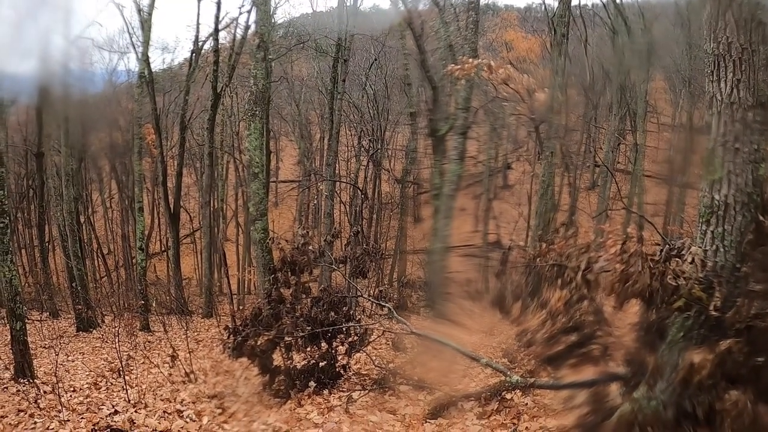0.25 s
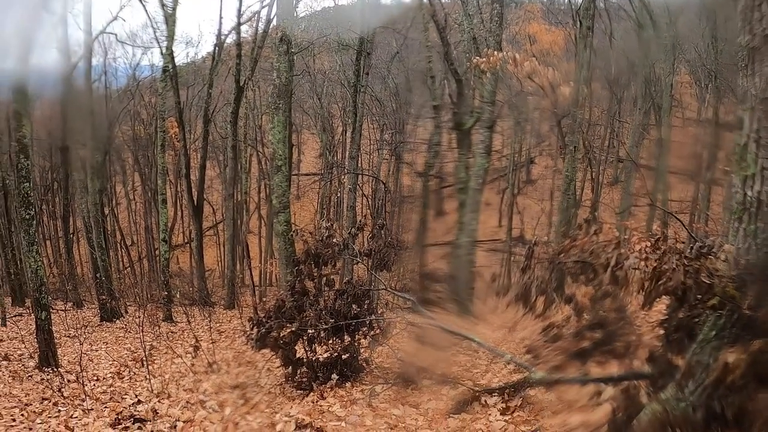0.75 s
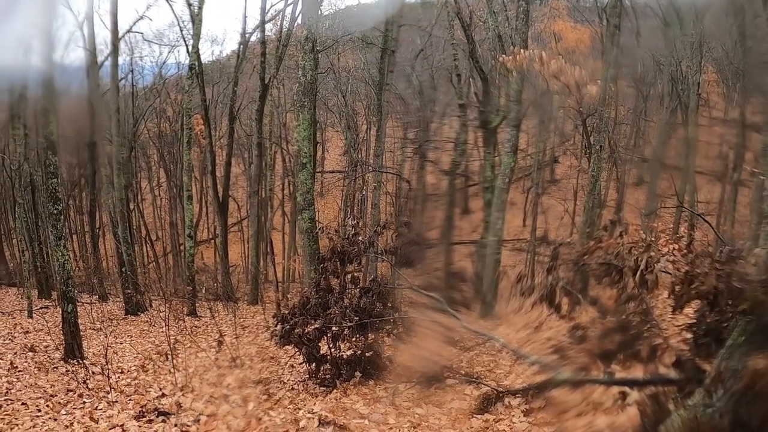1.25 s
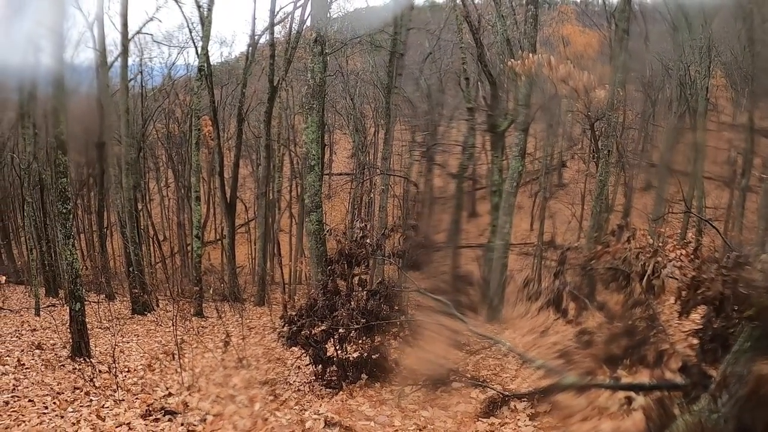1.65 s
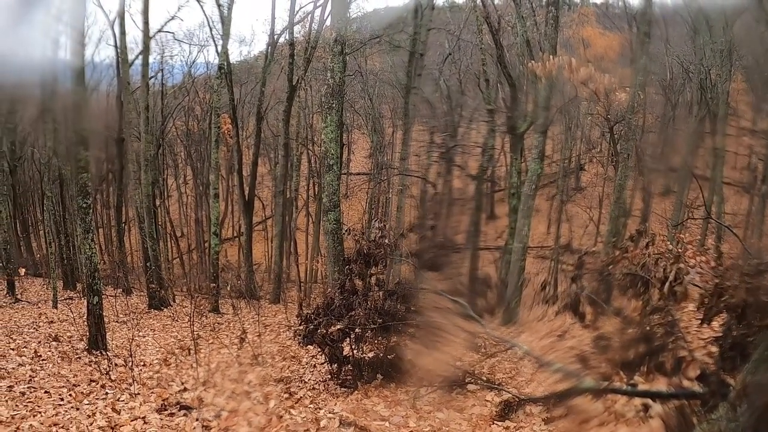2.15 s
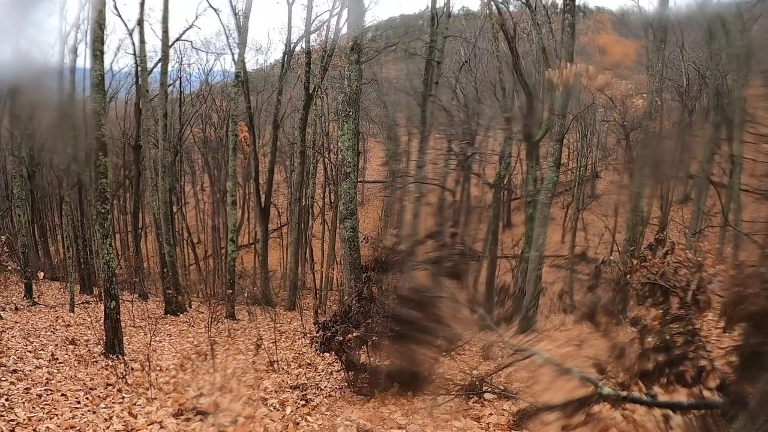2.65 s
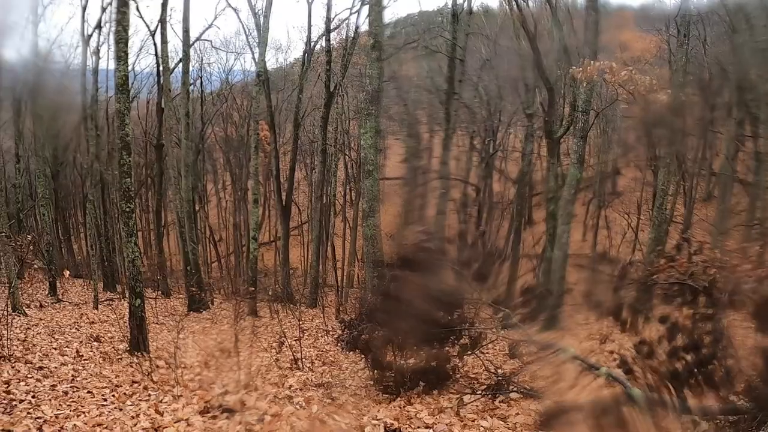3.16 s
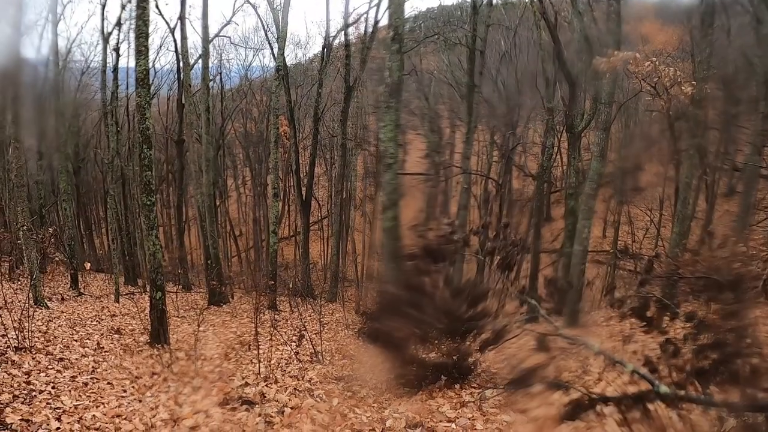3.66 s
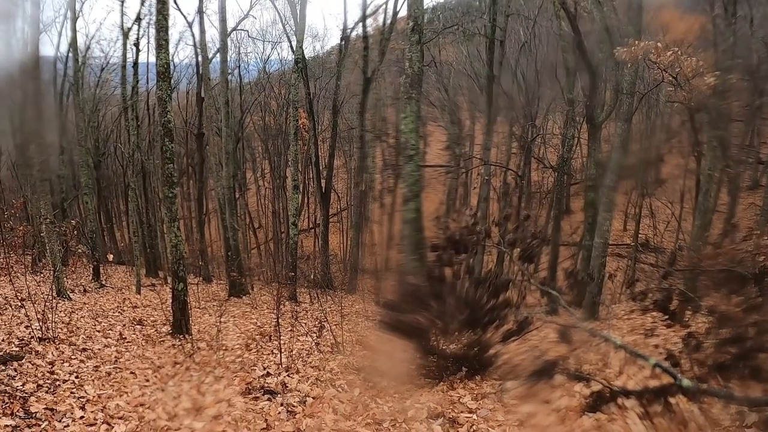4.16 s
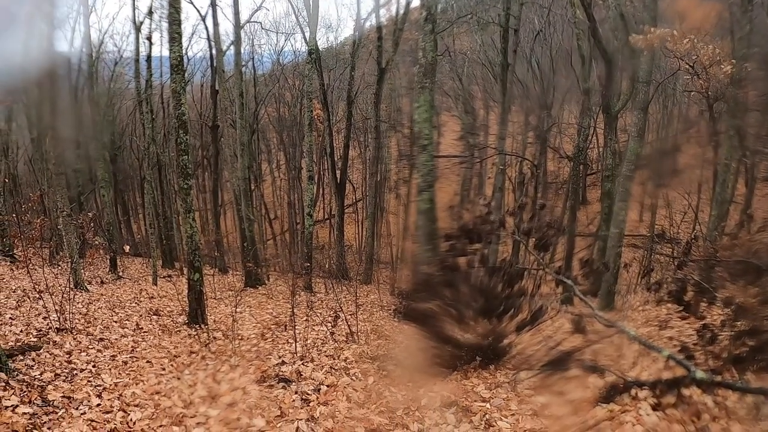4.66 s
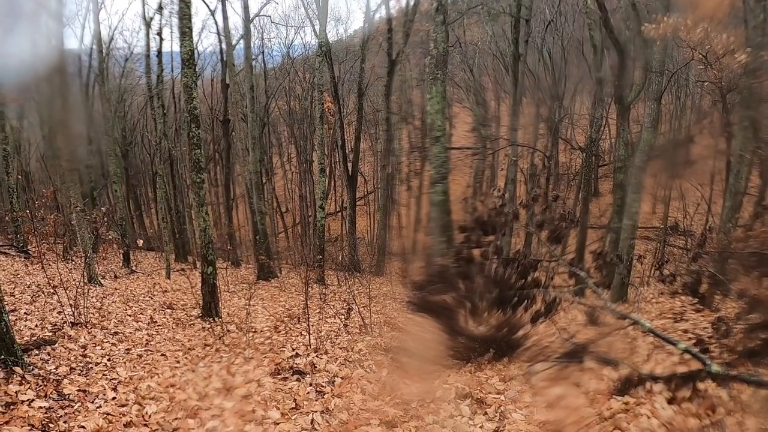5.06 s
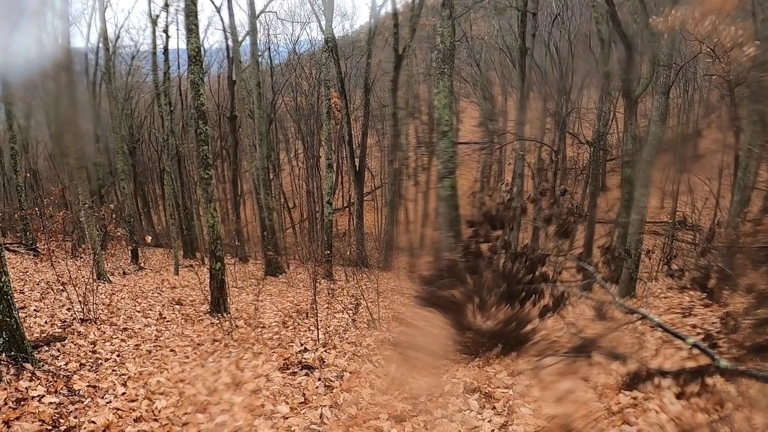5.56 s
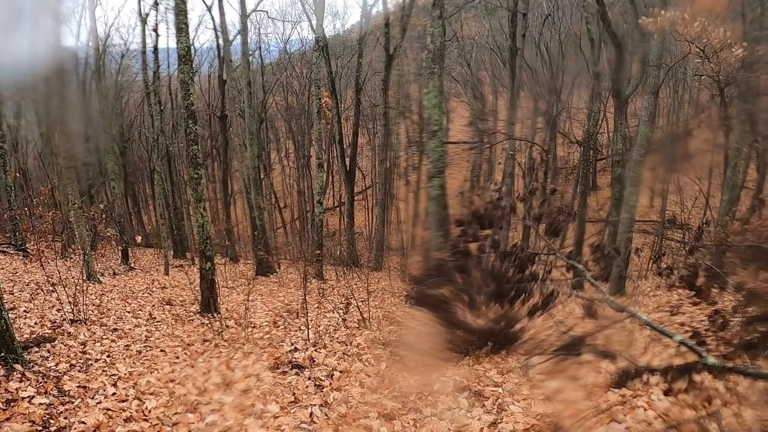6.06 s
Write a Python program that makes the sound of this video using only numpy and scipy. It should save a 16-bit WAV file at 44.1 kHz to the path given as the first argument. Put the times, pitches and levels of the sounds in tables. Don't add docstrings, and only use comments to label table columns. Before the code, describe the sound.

Distant hounds bay in three drawn-out calls across leafy woodland, echoing long, while drips tick and dry leaves rustle close by.

```python
import sys
import numpy as np
from scipy import signal
from scipy.fft import rfft, irfft, next_fast_len
from scipy.io import wavfile
from scipy.ndimage import uniform_filter1d

SR = 44100
rng = np.random.default_rng(int(sys.argv[2]) if len(sys.argv) > 2 else 0)


def volts(x):
    e = np.asarray(x, float) / 20
    return 10 ** e


def master(y):
    cut = np.clip(np.atleast_2d(y).T, -1, 1)
    pcm = np.round(cut * 32767)
    wavfile.write(sys.argv[1], SR, pcm.astype(np.int16))


N = 278271

# frequency in Hz, level in dB per Hz.
AIR_SPECTRUM = [(70, -15.5), (120, -7), (190, 1.5), (260, -1), (400, -8.5), (550, -8), (800, -21),
                (1050, -9), (1600, -14), (2500, -17), (4000, -18.5), (7800, -27.5), (9500, -42.5),
                (14000, -56.5)]
# frequency in Hz, left-right likeness of the air (0-1).
AIR_LIKENESS = [(30, .2), (120, 0.47), (300, 0.89), (1000, 0.76), (3000, 0.67), (8000, 0.11)]
# time in seconds, level in dB.
VALLEY_ROAR = [(0, -0.3), (2, -0.1), (3.2, 1), (3.8, 1.5), (4.2, -1.5), (5.2, -1), (5.7, -0.5),
               (6.31, -6.5)]
AIR_DB, AIR_SWELL_DB, ROAR_TOP_HZ = -55.5, 1.1, 360

# frequency in Hz, level in dB per Hz.
GUST_SPECTRUM = [(8.8, -24), (15, 1.5), (43, 2.5), (57, 1), (103, -17), (130, -22.5), (170, -55),
                 (290, -120)]
# time in seconds, level in dB.
BREEZE = [(0, -62.5), (1.7, -64), (1.85, -49), (2.5, -64), (2.65, -64), (2.85, -54), (3.44, -56),
          (3.55, -66), (6.31, -65)]
# peak time in seconds, peak level in dB.
PUFFS = [
    (1.8, -44),
    (2.049, -34.5),
    (2.36, -39.5),
    (2.8, -40.5),
]
PUFF_RISE_DB_PER_S, PUFF_FALL_DB_PER_S = 353, 218

# frequency in Hz, level in dB per Hz.
RUSTLE_SPECTRUM = [(600, -13.5), (1500, 1.5), (2500, -2), (4000, -6.5), (7800, -16.5), (9500, -31),
                   (14000, -46.5)]
# time in seconds, level in dB.
LITTER_CALM = [(0, -58.5), (2.6, -62), (3.2, -57.5), (5.1, -61), (6.31, -64)]
# peak time in seconds, peak level in dB.
STIRS = [(.14, -59.5), (1.0, -62), (1.17, -53.5), (1.29, -54), (1.72, -61), (2.1, -63), (2.86, -60.5),
         (3.62, -57.5), (3.78, -55), (4.3, -59.5), (4.821, -53.5), (5.32, -62.5), (6.16, -58.5)]
STIR_S = 0.11

# start in seconds, peak in dB, pitch in Hz, left-right in dB.
LOUD_TICKS = [(.2398, -42.5, 6460, -3), (.5866, -44, 3600, 9), (.884, -40.5, 4636, 0),
              (1.078, -43, 5500, -1), (1.1175, -41, 4500, -2), (1.155, -46.5, 5410, 1),
              (1.7786, -40.5, 3830, 5), (1.93, -43.5, 5446, -1), (1.805, -43.5, 5170, 2),
              (1.964, -34, 3500, 4), (2.3492, -41, 5700, -1), (2.615, -39.5, 3570, 4),
              (2.6237, -44, 6500, 2), (2.6612, -44, 3920, 7), (3.523, -42.5, 5440, -3),
              (3.6094, -46, 6000, -7), (4.0461, -33.5, 4320, 4), (4.0603, -45, 3950, 5.5),
              (4.181, -43.5, 5250, 3), (4.2075, -41, 4160, -1), (4.411, -41, 4215, 5),
              (4.4885, -38.5, 3780, 3.5), (4.7244, -38, 4860, 4), (4.7684, -43, 3900, 3),
              (4.8765, -44, 5864, 1), (5.3394, -42, 3400, 1), (5.3893, -39, 4750, 0.5),
              (5.9792, -42.5, 5020, 1), (6.24, -44, 4700, -1)]
# start in seconds, peak in dB, pitch in Hz, left-right in dB.
TWIG_SNAPS = [(.0747, -61, 9500, -1), (.708, -61.5, 9400, -2), (0.867, -55, 11300, -1.5),
              (.884, -55, 10500, 0.5), (.936, -52.5, 8960, -5), (1.078, -47, 11500, -1.5),
              (1.469, -58, 10000, -5), (1.7582, -56, 10770, 5), (2.052, -64, 10000, 3),
              (2.21, -63, 12100, 2), (2.455, -59, 8900, 1), (3.485, -59.5, 11000, 0),
              (3.522, -55.5, 10500, -3), (3.5503, -57.5, 10000, -4), (3.586, -58, 9900, 1),
              (3.609, -50.5, 11260, 0), (3.783, -59.5, 10100, -2), (3.941, -65, 9500, 0),
              (4.0454, -60.5, 11400, -1), (4.1525, -58.5, 8000, -0.5), (4.1813, -57.5, 11000, 1.5),
              (4.539, -57, 12800, 2), (4.7237, -59.5, 11000, 3), (4.795, -59, 9000, -0.5),
              (4.827, -52.5, 9000, 6), (4.994, -59, 10000, -2), (5.6116, -59, 9000, 4.5),
              (5.777, -57.5, 11370, 4), (5.9566, -55.5, 9500, 0.5), (6.146, -66, 9000, 0.5),
              (6.206, -58.5, 8900, -2)]
# start in seconds, peak in dB, pitch in Hz, left-right in dB.
BARK_DRIPS = [(4.0603, -32.5, 2350, 8), (.899, -43, 2851, 2), (1.631, -43, 1690, 5),
              (2.025, -44, 1200, 0.5), (2.204, -43.5, 1550, 4), (2.287, -44, 1440, 5),
              (2.35, -41.5, 2200, 1.5), (4.415, -36.5, 2195, 7)]
# start in seconds, peak in dB, pitch in Hz, left-right
# in dB.
SMALL_TICKS = [(0.131, -46, 2750, 2.5), (0.4622, -41.5, 3200, 4.0), (0.515, -49, 2860, 3),
               (0.599, -46, 2580, 4), (1.4585, -52, 2940, 1.5), (1.5288, -45, 2950, 7),
               (1.5994, -57, 3340, 3.5), (1.7576, -49, 3360, 4.0), (2.0127, -50, 3070, 1.5),
               (2.0666, -50, 3200, 5), (2.2664, -45, 2770, 5), (2.4532, -50, 2650, 2.0),
               (2.5266, -47, 3060, 2.5), (2.7933, -50, 3480, 7), (3.2559, -49, 5080, 4.5),
               (3.483, -46, 2600, 3.5), (3.5493, -37, 2770, 3.0), (3.585, -45, 2690, 1),
               (3.6365, -42, 2700, 3.0), (3.713, -40.5, 3960, 12), (3.7488, -37, 2540, 3),
               (3.7716, -45.5, 3150, 10), (3.9547, -43.5, 2800, 1), (4.152, -48, 3040, -2),
               (4.3369, -41.5, 2720, 1.5), (4.542, -52, 2800, 5.5), (4.8268, -44, 3120, 6.0),
               (4.97, -45, 3060, 1), (5.471, -42.5, 3340, -0.5), (5.88, -48, 2730, 7),
               (6.1812, -47, 2780, 1.5), (6.2017, -49, 3044, 5)]
# start in seconds, peak in dB, pitch in Hz, left-right in dB.
LEAF_SNAPS = [(1.289, -43, 4820, 3.5), (1.4834, -53.5, 4740, 2.0), (1.5298, -49, 4650, 1.0),
              (1.5994, -55, 4540, 1.5), (1.716, -46, 5420, 0.5), (2.2687, -54, 4610, 0.5),
              (2.3634, -45.5, 5130, 0), (2.454, -46, 6550, 0.5), (2.823, -48.5, 5530, 1.5),
              (2.8844, -54, 4610, 3.0), (3.5506, -44, 6020, 0), (3.609, -43, 4640, 2.5),
              (3.6844, -50.5, 4700, 3.0), (3.7504, -48.5, 5130, 2), (3.8691, -49, 4580, -1.0),
              (4.063, -47.5, 4720, 1.5), (4.3355, -52, 4840, -2), (4.4096, -46.5, 4960, 1),
              (4.4877, -43.5, 5196, 0.5), (4.5262, -50.5, 4660, -0.5), (4.6259, -53, 5130, 1.0),
              (4.8978, -46, 4690, 2.5), (4.9693, -49.5, 4740, 2), (5.1424, -57, 4640, -1.5)]
TICK_T60_S, TICK_RISE_S, TICK_SKIRT_DB = 0.011, 0.0007, -10

# frequency in Hz, decay time T60 in seconds.
WOODS_T60 = [(300, 1.32), (550, 1.292), (1100, 1.06), (2000, 1.2), (3000, 1.4)]
# frequency in Hz, gain in dB.
LEAF_LOSS = [(2300, 0), (3000, -9)]
# frequency in Hz, side gain in dB.
SIDE_GAIN = [(350, -13.5), (600, 2.0), (1200, 6.0)]
WOODS_DB, WOODS_SIDE_DB, WOODS_BUILD_S = -6.5, -15.5, 0.0026
VALLEY_DB, VALLEY_T60_RATIO = -10, 2.66
SHIMMER_DB, SHIMMER_HZ, SHIMMER_LONGEST_S = 2.6, 20, 0.08

# frequency in Hz, gain in dB.
THROAT = [(300, -36.5), (390, -15.5), (450, -4), (500, -1), (560, -2), (720, -1), (900, -11.5), (1100, -17),
          (1600, -13), (1900, -24), (2250, -39.5), (4000, -73)]
# time in seconds, pitch in Hz, level in dB,
# roughness (0-1), mouth opening in dB.
FIRST_BAY = [(.432, 567, -28.5, 0.2, 3.5), (.5, 553.2, -22, 0.3, -4.5), (.58, 519, -28.5, 0, -22.5),
             (.67, 503.1, -27.5, 0.09, 2.5), (.75, 515.8, -25, 0.05, -5.5), (.86, 528, -31.5, 0.05, 8.5),
             (.97, 531.3, -34, 0.02, 6.5), (1.04, 546.1, -28, 0, -1.5), (1.13, 545.6, -35, 0.01, -21)]
# time in seconds, pitch in Hz, level in dB, roughness (0-1), mouth opening in dB.
SECOND_BAY = [(3.655, 595, -38, 0.48, 7.5), (3.68, 575.5, -36.5, 0.36, 8.5), (3.706, 554.5, -27, 0.2, -2),
              (3.745, 563.5, -27, 0.32, -3), (3.79, 509.8, -30.5, 0.42, 1.3),
              (3.848, 503.4, -23, 0.099, -4.5), (3.92, 508.7, -28.5, 0.012, 5),
              (4.02, 552, -30, 0.044, 4.5), (4.086, 595.3, -20.5, 0.0087, -0.5),
              (4.16, 560.6, -28.5, 0.011, 3), (4.231, 537, -30, .02, 2)]
# time in seconds, pitch in Hz, level in dB, roughness (0-1), mouth opening in dB.
THIRD_BAY = [(5.268, 636.6, -25, 0.11, -5.5), (5.3, 576, -20.5, 0.2, -12.5), (5.35, 546.3, -27, 0.53, -5),
             (5.4, 533.6, -24.5, 0.37, -9), (5.451, 475.2, -30, 0.26, -2.5), (5.5, 525.3, -32, 0.51, -0.5),
             (5.559, 527.4, -25.5, 0.3, -7), (5.66, 541.4, -25.5, .2, -8), (5.71, 569.7, -26.5, 0.08, -8),
             (5.8, 575.3, -33.5, 0.043, -15), (5.896, 592.5, -36.5, 0.061, -5.5)]
# time in seconds, pitch in Hz, level in dB, roughness (0-1), mouth opening in dB.
ANSWERING_BAY = [(5.6, 480, -34, 0.12, -3), (5.691, 466, -28, 0.12, -9), (5.74, 469.3, -40.5, 0.38, -3),
                 (5.788, 499.8, -27, 0.2, -12.5), (5.879, 501, -37, 0.28, -4),
                 (5.972, 515.8, -37, 0.097, -3), (6.1, 510, -45.5, 0.16, -4.5),
                 (6.24, 520, -39.5, 0.17, -4.5)]
# gain in dB, bay by bay.
THIRD_DB = [-6.0, -3, -4.5, 0.7]
UNEVEN_PAIRS = [0.28, 1.35, 1.43, 4.8]
HOARSE_HZ, WOBBLE, FLUTTER_DB = 71.6, 0.003, 2.0
ONSET_S, ONSET_PITCH_RATIO, RELEASE_S, SILENT_DB = 0.027, 1.1, 0.028, -21.5

# start in seconds,
# length in seconds, first and last pitch in Hz, level in dB.
WHINES = [(0.272, 0.056, 623, 655, -51), (.915, 0.13, 2100, 2200, -54), (3.14, 0.14, 5200, 5150, -64),
          (3.354, 0.051, 1825, 1815, -33), (3.389, 0.045, 1770, 1300, -45), (3.404, 0.05, 1128, 866, -39.5),
          (3.42, 0.19, 1892, 1834, -49.5), (3.528, 0.09, 1067, 1053, -36.5), (3.57, .08, 1031, 896, -35),
          (3.592, 0.0447, 1263, 980, -26), (3.643, 0.1, 920.3, 831, -28), (4.119, 0.13, 904, 725, -48),
          (4.632, 0.079, 1065, 1129, -34.5), (4.731, 0.076, 1125, 1110, -44), (4.794, .17, 1095, 1110, -51),
          (4.943, .26, 1101, 1100, -62), (.36, 0.035, 1266, 1100, -46), (6.14, 0.22, 1501, 1475, -47.5),
          (5.899, 0.14, 1568, 1540, -51.5), (5.23, 0.2, 1820, 1790, -50.5),
          (5.66, 0.23, 466.2, 442.6, -37.5), (5.732, .22, 699.4, 781, -40)]
# start in seconds, length in seconds, first and last pitch in Hz, level in dB.
YELPS = [
    (3.405, 0.06, 571.5, 690, -38),
    (3.631, 0.049, 1082, 900, -29),
    (5.208, .075, 1147.5, 800.1, -38),
]
# start in seconds, length in seconds, first and last pitch in Hz, level in dB.
CRIES = [
    (6.07, 0.052, 1470, 1490, -33.5),
    (6.04, 0.065, 830, 1500, -40.5),
]
# start in seconds, length in seconds, first and last
# pitch in Hz, level in dB.
RASPS = [(3.76, .14, 820, 650, -35), (3.675, 0.056, 1900, 1750, -41.5), (3.735, .045, 1520, 1500, -38),
         (3.8, .1, 1400, 1400, -44), (.55, .055, 690, 720, -32.5), (6.14, .14, 2900, 2700, -56),
         (.47, 0.136, 650, 715, -31), (2.78, 0.22, 723, 705, -62.5), (0.49, 0.06, 1440, 1257, -38.5),
         (.59, 0.088, 1350, 1370, -37.5), (2.775, .14, 1786, 1700, -51), (2.79, 0.15, 2100, 2100, -55.5),
         (3.42, 0.091, 690, 550, -48), (5.255, 0.11, 903.5, 748, -35.5), (5.4, .2, 960, 840, -41),
         (5.7, 0.12, 1140, 1128, -42.5), (6.055, .11, 1154, 1094, -42), (6.08, 0.055, 1787, 1755, -46),
         (6.3, 0.13, 1490, 1431, -41.5), (6.13, 0.083, 2250, 2206, -49)]
# start in seconds, length in seconds, first and last pitch in Hz, level in dB.
SCOOPS = [
    (0.349, 0.051, 1226, 913, -39.5),
    (.382, 0.043, 950, 825, -36.5),
    (.41, .055, 898, 893, -38),
    (5.212, .06, 1116, 894, -51),
]
# roughness (0-1), octave level in dB.
FOLDS = [
    (0.03, -15.5),
    (0.7, -14),
    (0.35, 4),
    (0.84, -13.5),
    (0.15, 4),
]
CALL_ATTACK_S, CALL_RELEASE_S, CALL_SAG_DB, GLIDE_BEND = 0.015, 0.012, -4.5, 1.507
OCTAVE_FALL_DB, OCTAVE_TURN_HZ = -19.5, 936
HOUND_LAG_S = 3.5e-5


def rms_one(x):
    return x / np.sqrt(np.mean(np.abs(x) ** 2) + 1e-20)


def at_hz(points, hz):
    points_hz, values = np.array(points).T
    return np.interp(np.log(np.maximum(hz, 1)), np.log(points_hz), values)


def along(rows):
    return np.interp(np.arange(N) / SR, *np.transpose(rows))


def filtered(x, spectrum):
    size = next_fast_len(N)
    gain = volts(at_hz(spectrum, np.fft.rfftfreq(size, 1 / SR)))
    return irfft(rfft(x, size) * gain, size)[..., :N]


def coloured(x, spectrum):
    return rms_one(filtered(x, spectrum))


def passed(x, order, band_hz, kind="band"):
    return signal.sosfilt(signal.butter(order, band_hz, kind, fs=SR, output="sos"), x)


def drift(rate_hz, count=N):
    r = np.exp(-2 * np.pi * rate_hz / SR)
    run_in = int(2 * SR / rate_hz)
    blocks = -(-(count + run_in) // 8192)
    white = rng.standard_normal(blocks * 8192)[:run_in + count]
    return rms_one(signal.lfilter([1], [1, -2 * r, r * r], white)[run_in:])


def air():
    size = next_fast_len(N)
    alike = np.clip(at_hz(AIR_LIKENESS, np.fft.rfftfreq(size, 1 / SR)), 0, 1)
    mid, side = rfft(rng.standard_normal((2, size)))
    ports = np.sqrt(1 + alike) * mid + np.sqrt(1 - alike) * side * [[1], [-1]]
    both = coloured(irfft(ports, size)[:, :N], AIR_SPECTRUM)
    low = filtered(both, [(ROAR_TOP_HZ * 0.8, 0), (ROAR_TOP_HZ * 1.2, -40)])
    swell = volts(AIR_DB + AIR_SWELL_DB * drift(3))
    return swell * (both + (volts(along(VALLEY_ROAR)) - 1) * low)


def wind_db():
    t = np.arange(N) / SR
    puffs = [db - np.maximum(PUFF_RISE_DB_PER_S * (s - t), PUFF_FALL_DB_PER_S * (t - s)) for s, db in PUFFS]
    return np.max([along(BREEZE)] + puffs, axis=0)


def gusts(gust_db):
    lumps = volts([3.0 * drift(8), 3.0 * drift(8)])
    pressure = coloured(lumps * rng.standard_normal((2, N)), GUST_SPECTRUM)
    return volts(gust_db + np.array([[-1.3], [1.3]])) * pressure


def litter_db():
    t = np.arange(N) / SR
    stirs = sum(volts(2 * db) * np.exp(-((t - s) / STIR_S) ** 2) for s, db in STIRS)
    return 10 * np.log10(volts(2 * along(LITTER_CALM)) + stirs)


def rustle(rustle_db):
    born = rng.random(N) < 4000 * volts(4.0 * drift(14)) / SR
    size_db = 3.25 * np.minimum(rng.exponential(1, N), 5)
    snaps = born * volts(size_db) * rng.choice([-1, 1], N)
    left = np.clip(0.87 + 0.5 * rng.standard_normal(N), 0, 1)
    return volts(rustle_db + 2.0) * coloured(snaps * np.sqrt([left, 1 - left]), RUSTLE_SPECTRUM)


def ticks():
    t = np.arange(600) / SR
    out = np.zeros((2, N + len(t)))
    events = [*LOUD_TICKS, *TWIG_SNAPS, *BARK_DRIPS, *SMALL_TICKS, *LEAF_SNAPS]
    draws = rng.standard_normal((len(events), 3, len(t)))
    shape = volts(-60 * t / TICK_T60_S) * (1 - np.exp(-t / TICK_RISE_S))
    bursts = (draws[:, :1] + 0.36 * draws[:, 1:]) * shape
    for (s, peak_db, hz, pan_db), burst in zip(events, bursts):
        ring = passed(burst, 3, [hz * 0.63, hz * 1.215])
        skirt = passed(burst, 3, [hz * 0.45, min(hz * 2.2, 8500)])
        tick = ring + volts(TICK_SKIRT_DB) * skirt
        gain = volts(peak_db + 1.0 + np.array([[0.5], [-0.5]]) * pan_db)
        first = round(s * SR)
        out[:, first:first + len(t)] += tick / np.abs(tick).max() * gain
    return out[:, :N]


def shimmer():
    flicker = drift(SHIMMER_HZ)
    return rms_one(flicker - uniform_filter1d(flicker, size=int(SHIMMER_LONGEST_S * SR)))


def woods(x):
    t = np.arange(5 * SR // 2) / SR
    white = rng.standard_normal((2, len(t)))
    edges_hz = 250 * 2 ** np.arange(0, 4.6, 0.5)
    tail = 0
    for low, high in zip(edges_hz, edges_hz[1:]):
        fall_db = -60 * t / at_hz(WOODS_T60, np.sqrt(low * high))
        decay = volts(fall_db) + volts(VALLEY_DB + fall_db / VALLEY_T60_RATIO)
        tail = tail + passed(white, 2, [low, high]) * decay
    tail = tail * (1 - np.exp(-t / WOODS_BUILD_S)) / 40
    scattered = signal.fftconvolve(filtered(x, LEAF_LOSS)[None], tail, axes=1)[:, :N]
    mid, side = scattered * volts(WOODS_DB - 0.5 + SHIMMER_DB * shimmer())
    return mid + volts(WOODS_SIDE_DB) * filtered(side, SIDE_GAIN) * [[1], [-1]]


def played(rows):
    s, *columns = np.transpose(rows)
    first, last = round(s[0] * SR), min(round(s[-1] * SR), N)
    t = np.arange(first, last) / SR
    return first, [np.interp(t, s, c) for c in columns]


def partial(turns, rough, spread_hz):
    count = len(turns)
    torn = (drift(spread_hz, count) + 1j * drift(spread_hz, count)) * np.sqrt(0.5)
    torn = torn * volts(2.0 * drift(21.86, count) + 1.92)
    clean = np.sqrt(1 - rough) * volts(FLUTTER_DB * drift(15.05, count))
    return np.sqrt(2) * np.real((clean + np.sqrt(rough) * torn) * np.exp(2j * np.pi * turns))


def short_call(row, folds):
    s, length_s, first_hz, last_hz, level_db = row
    rough, octave_db = folds
    t = np.linspace(0, length_s, num=24)
    pitch = last_hz + (first_hz - last_hz) * (1 - t / length_s) ** GLIDE_BEND
    attack = np.maximum(1 - t / CALL_ATTACK_S, 0)
    release = np.maximum(1 - (length_s - t) / CALL_RELEASE_S, 0)
    level = level_db + SILENT_DB * (attack + release) + CALL_SAG_DB * t / length_s
    octave = octave_db + OCTAVE_FALL_DB * np.maximum(np.log2(pitch / OCTAVE_TURN_HZ), 0)
    return np.column_stack([s + t, pitch, level, rough + 0 * t, octave])


def yelp(rows):
    first, (pitch, level_db, rough, octave_db) = played(rows)
    turns, rough = np.cumsum(pitch) / SR, np.clip(rough, 0, 1)
    third = volts(-16.0) * rough * partial(3 * turns, rough ** 0.33, 260)
    upper = partial(2 * turns, rough, 130) + third
    return first, volts(level_db) * (partial(turns, rough, 130) + volts(octave_db) * upper)


def whole_bay(rows, uneven):
    first, last = np.array(rows[0]), np.array(rows[-1])
    onset = first * [1, ONSET_PITCH_RATIO, 1, 1, 1] + [-ONSET_S, 0, SILENT_DB, 0, 0]
    release = last + [RELEASE_S, 0, SILENT_DB, 0, 0]
    whole = np.vstack([onset, rows, release])
    return np.column_stack([whole, uneven * whole[:, 3]])


def bay(rows, third_db):
    first, (pitch, level_db, rough, mouth_db, half) = played(rows)
    pitch = pitch * (1 + WOBBLE * drift(19, len(pitch)))
    turns, rough = np.cumsum(pitch) / SR, np.clip(rough, 0, 1)
    voice = 0
    for k in np.arange(2, 11) / 2:
        share = 1 if k % 1 == 0 else np.clip(half, 0, 1)
        blurred = 1 - (1 - rough) ** (k ** 1.5)
        gain = share * volts(mouth_db * (k > 1) + third_db * (k > 2.7))
        voice = voice + gain * partial(k * turns, blurred, HOARSE_HZ * np.sqrt(k))
    return first, volts(level_db) * voice


def hounds():
    bays = map(whole_bay, [FIRST_BAY, SECOND_BAY, THIRD_BAY, ANSWERING_BAY], UNEVEN_PAIRS)
    kinds = zip([WHINES, YELPS, CRIES, RASPS, SCOOPS], FOLDS)
    short = [short_call(row, folds) for rows, folds in kinds for row in rows]
    out = np.zeros((2, N))
    for line, calls in zip(out, [map(bay, bays, THIRD_DB), map(yelp, short)]):
        for first, sound in calls:
            line[first:first + len(sound)] += sound
    return filtered(out[0], THROAT) + passed(out[1], 4, 390, "high")


def scene():
    pack = hounds()
    left, right = pack * volts([[-2.6], [-3.4]]) + woods(pack)
    n = np.arange(N)
    heard = np.stack([np.interp(n - HOUND_LAG_S * SR, n, left), right])
    return air() + gusts(wind_db()) + rustle(litter_db()) + ticks() + heard


def band_limit(x):
    return signal.sosfilt(signal.butter(12, 14250, fs=SR, output="sos"), x)


def record(dry):
    late = np.stack([np.roll(dry[0], 1), dry[1]])
    return band_limit(late)


dry = scene()
out = record(dry)
master(out)
```